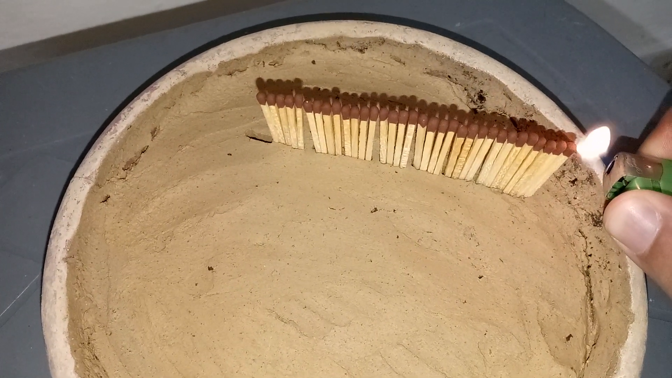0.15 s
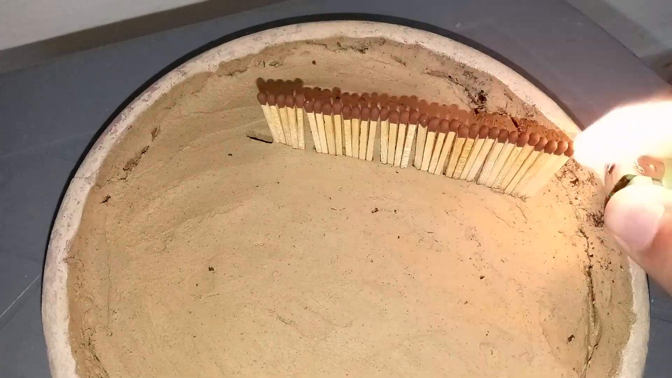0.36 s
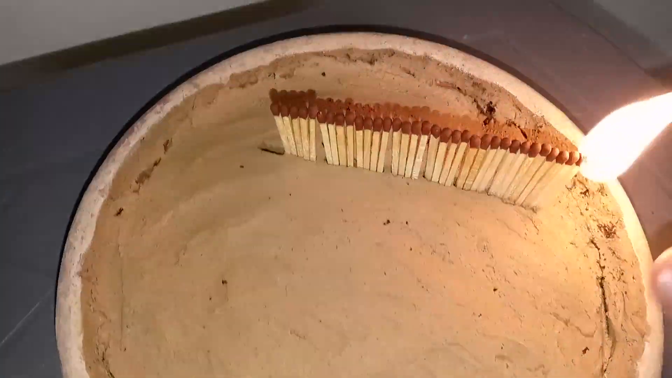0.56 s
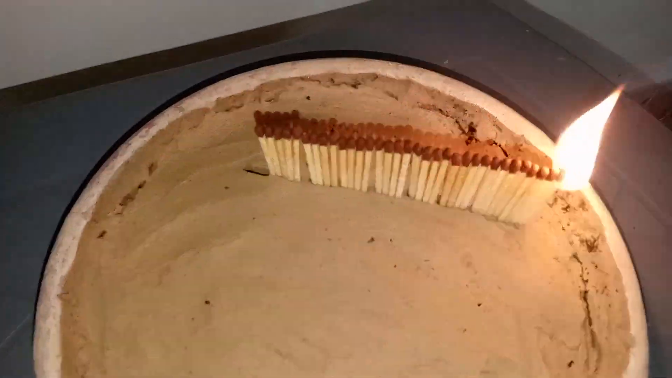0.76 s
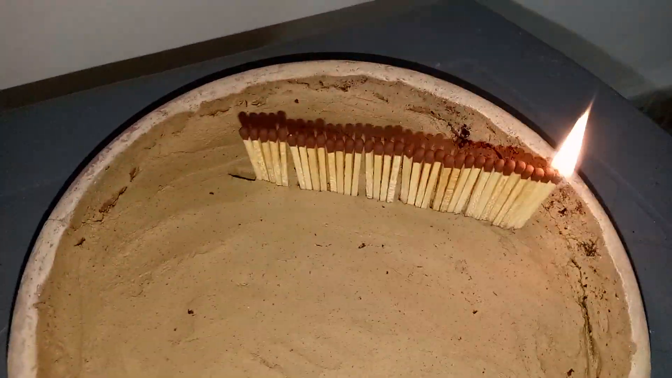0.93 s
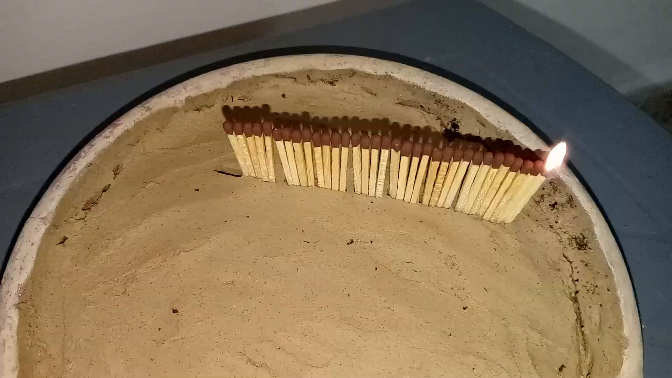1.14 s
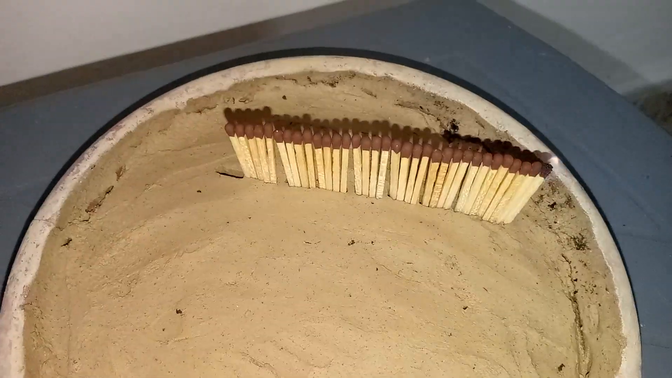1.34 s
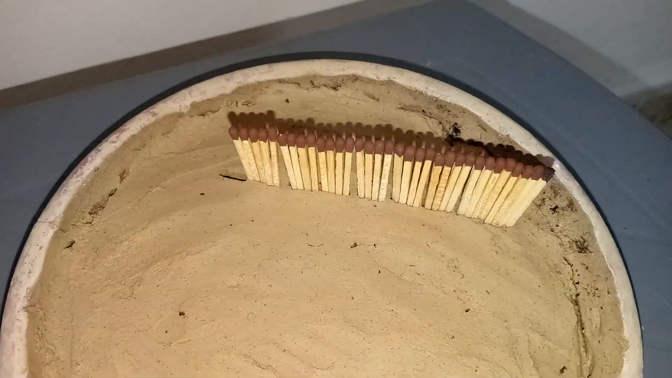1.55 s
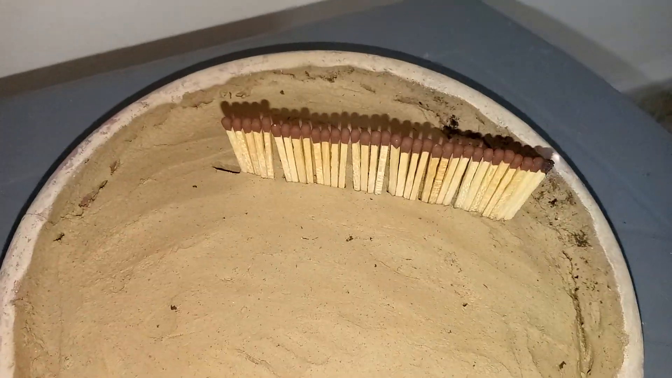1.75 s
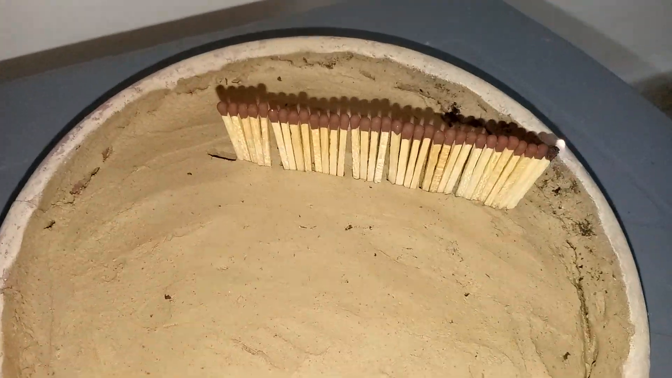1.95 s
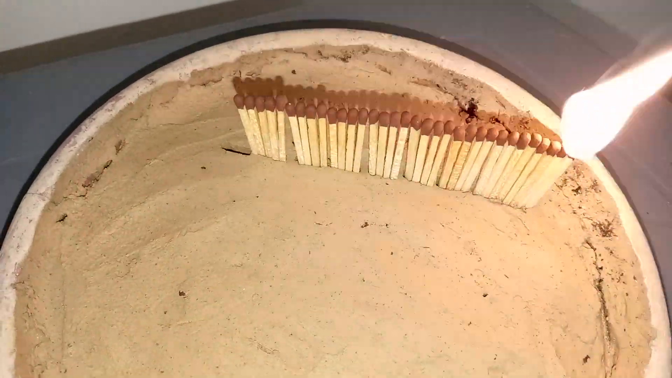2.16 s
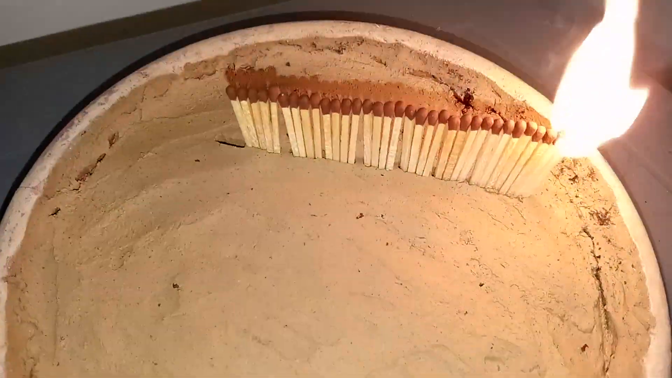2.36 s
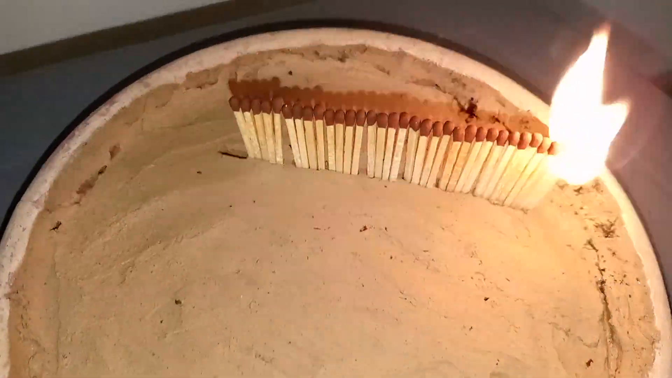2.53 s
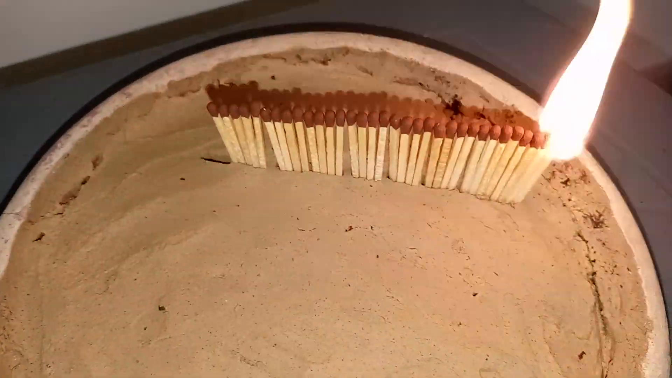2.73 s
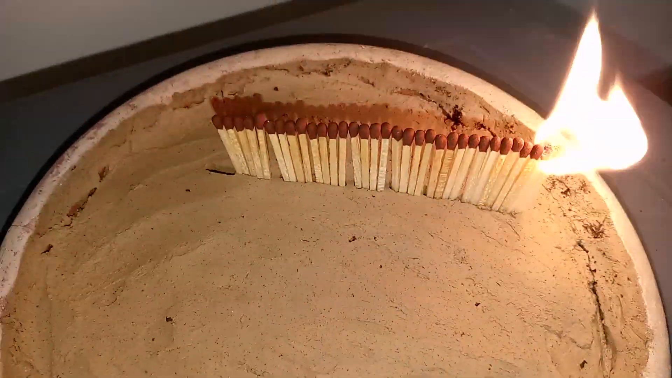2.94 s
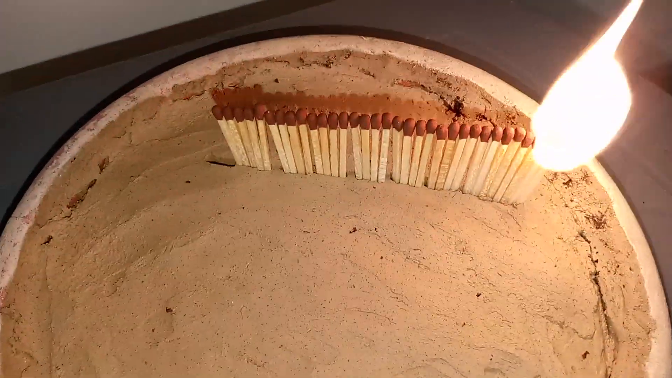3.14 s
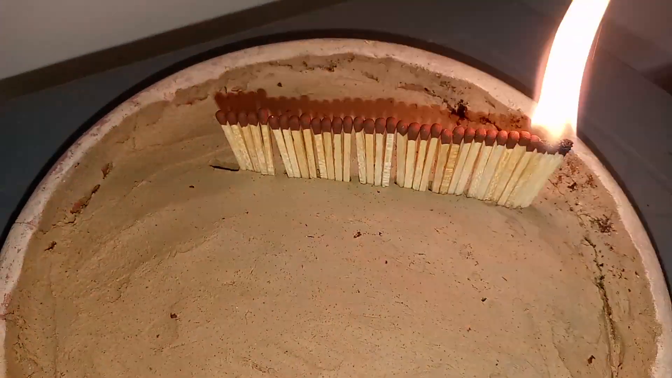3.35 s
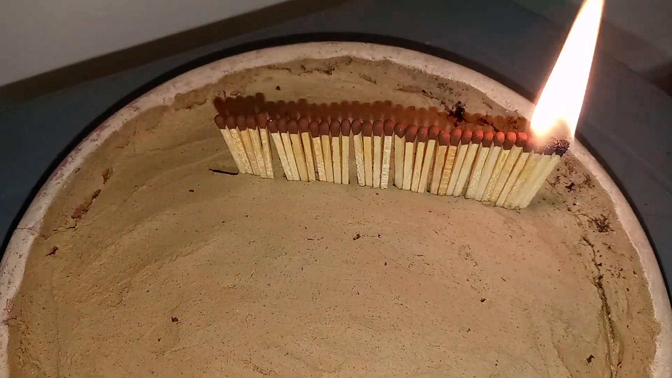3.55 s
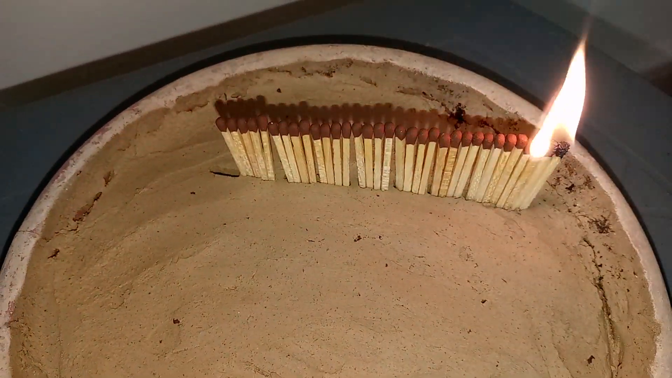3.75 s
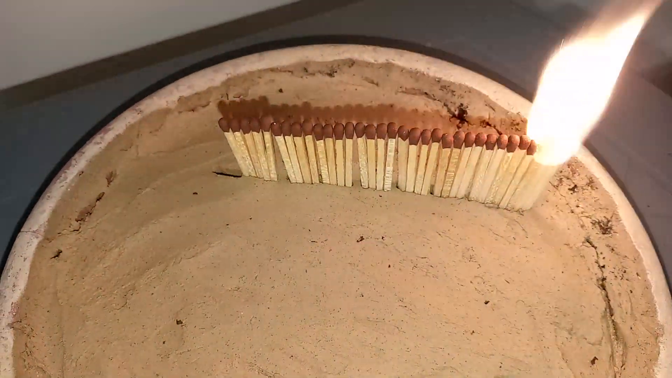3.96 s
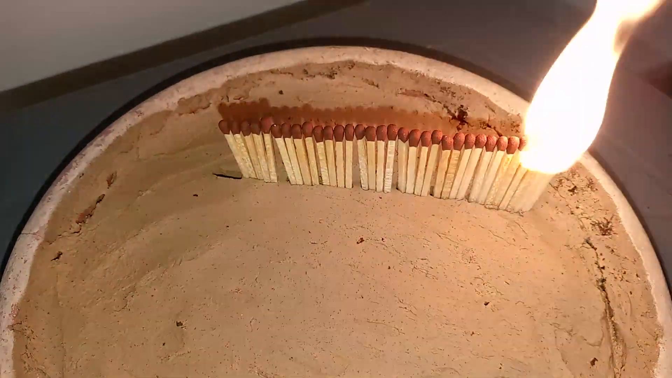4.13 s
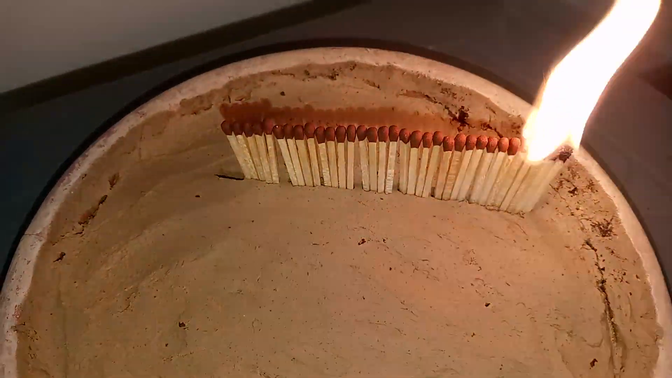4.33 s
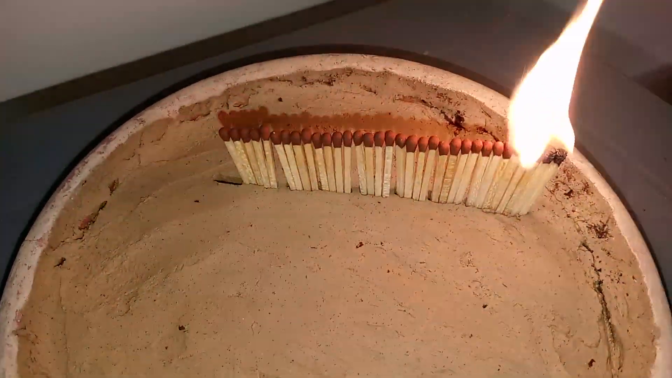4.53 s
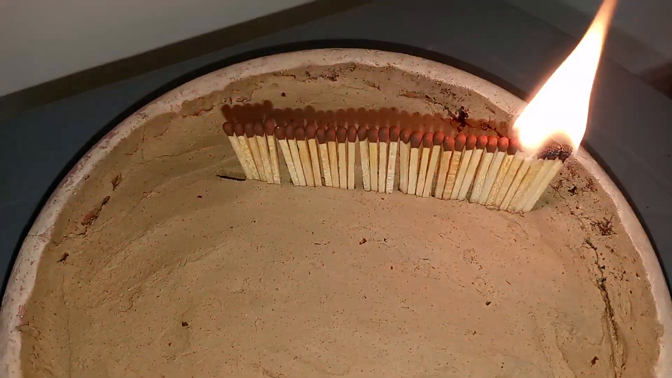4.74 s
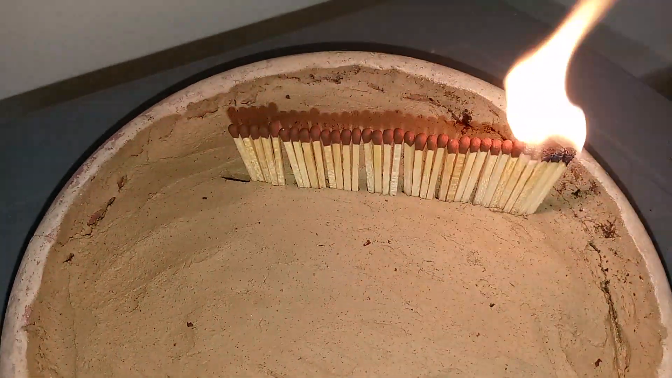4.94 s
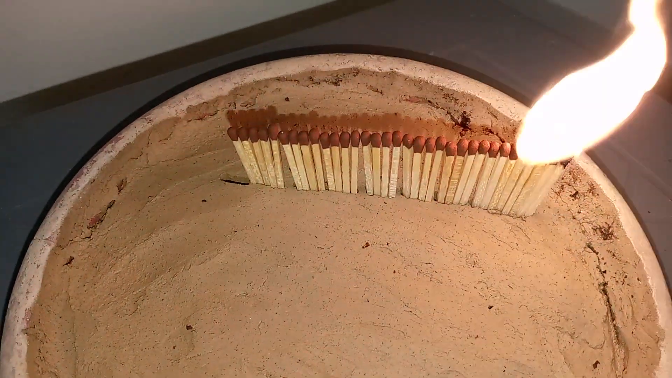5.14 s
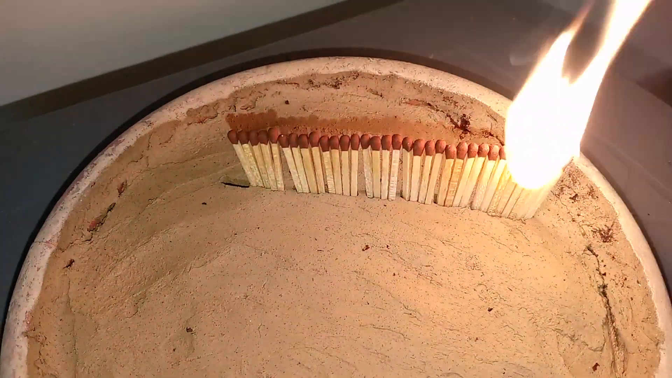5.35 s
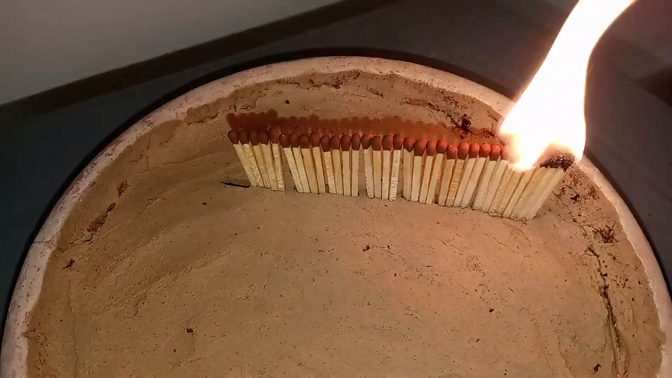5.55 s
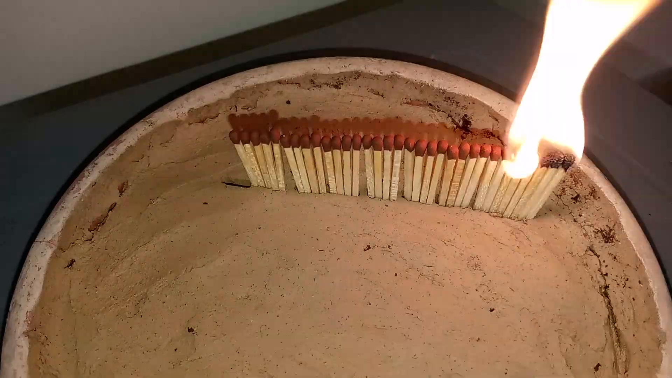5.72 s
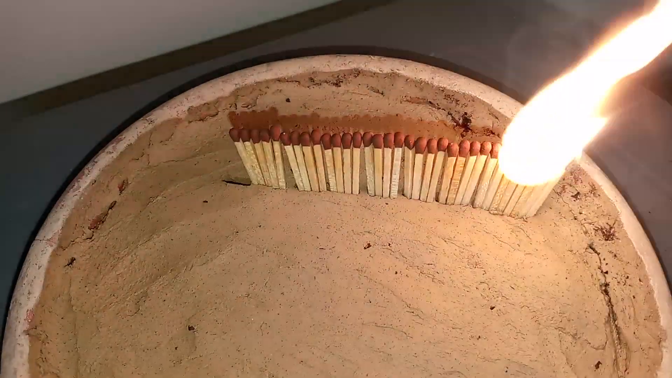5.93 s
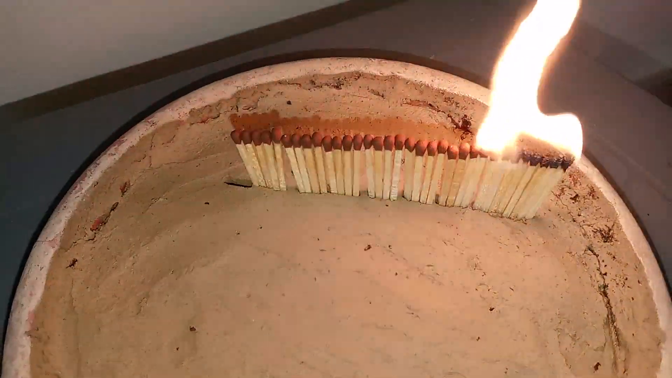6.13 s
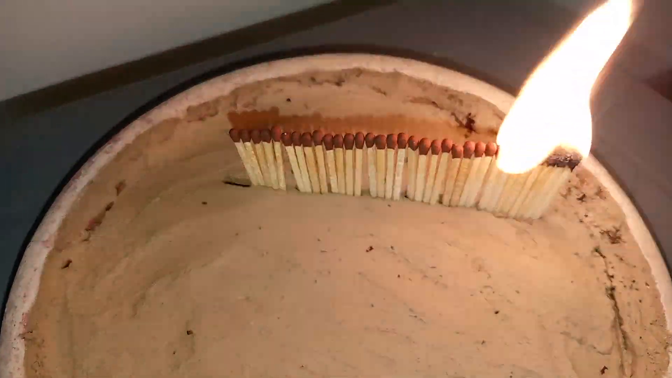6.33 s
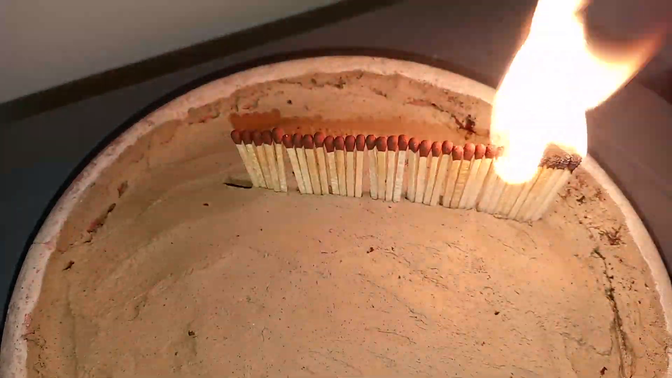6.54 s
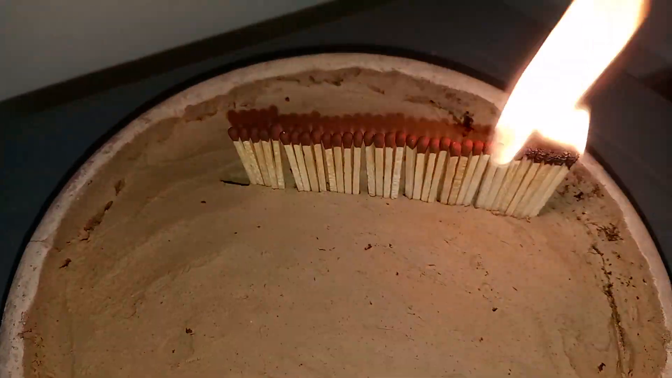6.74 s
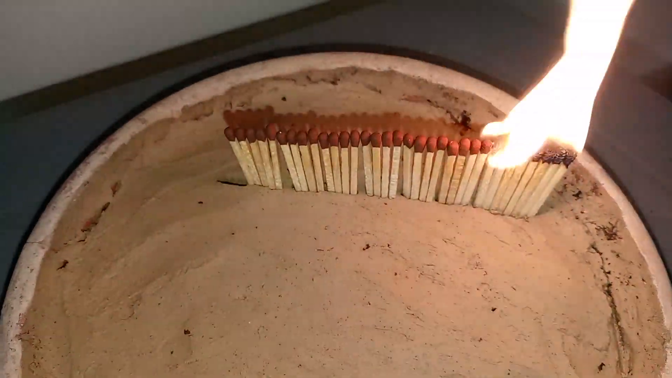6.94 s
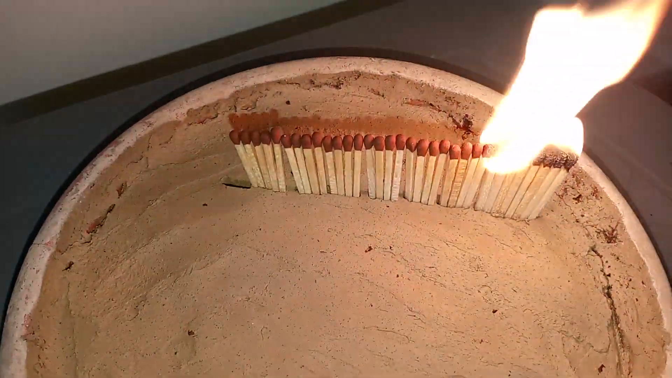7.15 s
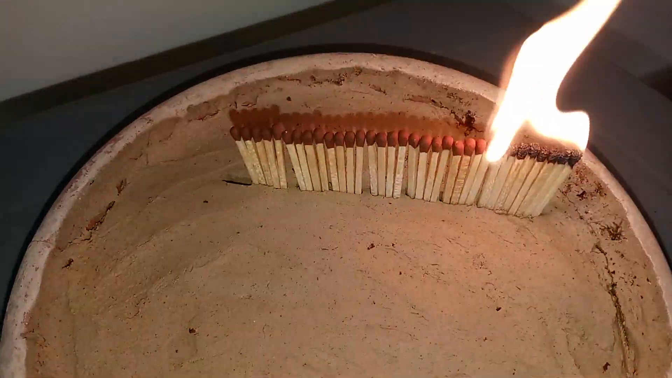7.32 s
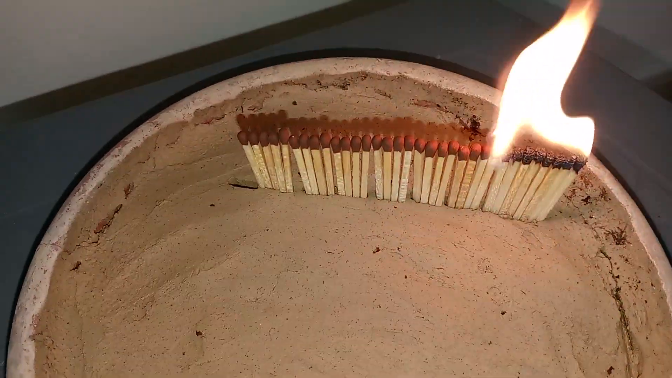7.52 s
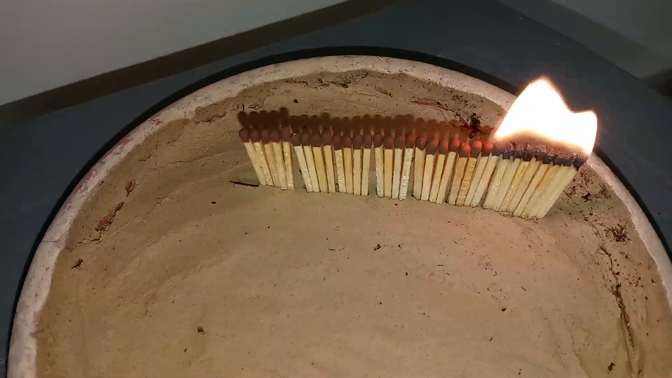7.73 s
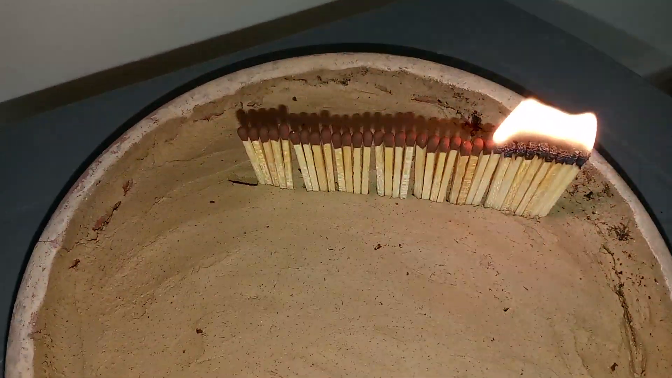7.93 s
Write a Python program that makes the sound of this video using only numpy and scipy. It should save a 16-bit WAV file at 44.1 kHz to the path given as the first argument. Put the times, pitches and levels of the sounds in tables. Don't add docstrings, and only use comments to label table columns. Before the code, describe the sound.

A close microphone hears match heads igniting in turn. A brief hiss leads to one loud, dry, bright crack, a short fading flare and cooling ticks. A quiet gap follows, then a chain of fluttering whooshes, hissing and roaring for around half a second to a second, spitting crumbs. The last is weaker and stutters out in crackles. The small room adds little echo over a very faint floor noise.

```python
import sys
import numpy as np
from scipy import signal
from scipy.fft import rfft, irfft
from scipy.io import wavfile
from scipy.ndimage import uniform_filter1d

SR = 44100
rng = np.random.default_rng(int(sys.argv[2]) if len(sys.argv) > 2 else 0)


def wrap_up_sound(samples):
    columns = np.atleast_2d(samples).T
    tamed = np.clip(columns, -1, 1)
    steps = np.round(tamed * 32767).astype(np.int16)
    wavfile.write(sys.argv[1], SR, steps)


def invert_db(level):
    return 10 ** (np.asarray(level, dtype=float) / 20)


N = 351918
TIME = np.arange(N) / SR
SIZE = 8192
HZ = np.maximum(np.arange(SIZE // 2 + 1), .5) * SR / SIZE


def rms_one(x):
    return x / np.sqrt(np.mean(x ** 2) + 1e-20)


def at_hz(points):
    hz, db = np.transpose(points)
    return np.interp(np.log(HZ), np.log(hz), db)


def causal(db):
    cepstrum = irfft(db * np.log(10) / 20, SIZE)
    cepstrum[1:SIZE // 2] *= 2
    cepstrum[SIZE // 2 + 1:] = 0
    response = irfft(np.exp(rfft(cepstrum)), SIZE)[:SIZE // 2]
    return rms_one(response) / np.sqrt(SIZE // 2)


def through(x, response):
    return signal.oaconvolve(x, response)[:N]


def lagging(x, lag_s):
    r = np.exp(-1 / (lag_s * SR))
    return signal.lfilter([1 - r], [1, -r], x)


def drift(rate, size=N):
    r = np.exp(-2 * np.pi * rate / SR)
    settle = 9000
    noise = rng.standard_normal(size + settle)
    return rms_one(signal.lfilter([1], [1, -2 * r, r * r], noise)[settle:])


def sputter(per_s, size_db, t60):
    sizes = invert_db(size_db * np.minimum(rng.exponential(1, N), 4))
    born = (rng.random(N) < per_s / SR) * sizes
    return rms_one(1 + signal.lfilter([1], [1, -invert_db(-60 / (t60 * SR))], born))


# (f/Hz, level/dB per Hz)
FLOOR_SPECTRUM = [(15, -61), (25, -35), (64, -29.5), (108, -2.5), (180, -22.5), (335, -27), (476, -14.5),
                  (754, -18.5), (1160, -20), (1260, -19), (1740, -22), (6050, -39), (16000, -46)]


def floor_noise():
    return invert_db(-70) * through(rng.standard_normal(N), causal(at_hz(FLOOR_SPECTRUM)))


# (start t/s, end t/s, f/Hz, level/dB)
WHISTLE_TONES = [(0, 0.11, 1580, -73.5), (0, .04, 1480, -80), (.08, .13, 1255, -80),
                 (2.84, 2.92, 1370, -74), (1.68, 1.81, 585, -74), (1.84, 1.89, 620, -74),
                 (1.847, 1.883, 255, -68), (1.941, 1.99, 635, -72), (1.967, 2.03, 262, -70),
                 (3.4, 3.44, 400, -71), (3.56, 3.6, 670, -76), (3.63, 3.673, 390, -72),
                 (3.716, 3.85, 620, -75), (7.42, 7.44, 350, -68), (7.558, 7.62, 640, -78),
                 (7.7, 7.98, 50, -70)]


def whistles():
    out = np.zeros(N)
    for start, end, hz, db in WHISTLE_TONES:
        at = round(start * SR)
        size = min(SR // 3, N - at)
        age = np.arange(size) / SR
        fade_db = 170 * np.maximum(age - (end - start), 0)
        swell = invert_db(db + 3.0 * drift(25, size) - fade_db)
        wavering_hz = hz * (1 + 0.015 * drift(60, size))
        out[at:at + size] += swell * np.sin(2 * np.pi * np.cumsum(wavering_hz) / SR)
    return out


def flame_rumble(roar):
    flame = invert_db(-68) + invert_db(-15.5) * lagging(roar, lag_s=0.045)
    soft = causal(-10 * np.log10(1 + (HZ / 250) ** 4) - 10 * np.log10(1 + (60 / HZ) ** 8))
    rumble = flame * invert_db(-3.0 + 2.0 * drift(12)) * rng.standard_normal(N)
    return through(rumble, soft)


# (f/Hz, level/dB per Hz)
JET_SPECTRUM = [(40, -30), (100, -9), (300, -5.5), (800, -2), (2000, -7), (5000, -5), (10000, -4.5),
                (12000, -11), (14000, -22), (16000, -22.5), (17500, -32)]


def peaks_db(path):
    return at_hz(JET_SPECTRUM) + sum(db / (1 + (2 * (HZ - hz) / width) ** 2) for hz, width, db in path)


# (t/s, level/dB)
SIZZLE = [(0, -80), (.31, -77), (.9, -57), (1.13, -57), (1.27, -61), (1.38, -72.5), (1.5, -75), (1.65, -67),
          (2.1, -70.5), (2.8, -66), (3.5, -69.5), (4.8, -66.5), (5.0, -68), (5.802, -66.5), (6.85, -68),
          (7.6, -68.5), (7.98, -73)]
# (f/Hz, width f/Hz, level/dB)
FIRST_CHAR_PATH = [(546, 63, 3), (3200, 2100, 9), (4570, 600, -10), (6100, 1100, 9.5), (8400, 940, -6),
                   (9900, 5100, 8.5), (13400, 850, -8), (14800, 1100, 9)]
# (f/Hz, width f/Hz, level/dB)
CHARRED_ROW_PATH = [(634, 120, 8), (1630, 270, 4), (3500, 800, 3.5), (4800, 530, -16), (6030, 790, 5.5),
                    (8150, 900, -10), (10100, 2300, 9.5), (13300, 720, -5), (15100, 1100, 8)]


def ember_sizzle():
    s, db = np.transpose(SIZZLE)
    level = invert_db(np.interp(TIME, s, db) - 3.0 + 1.3 * drift(24))
    sizzle = level * rng.standard_normal(N) * sputter(60, 0.99, 0.01)
    row_chars = TIME >= 2.3
    first = through(sizzle * ~row_chars, causal(peaks_db(FIRST_CHAR_PATH)))
    return first + through(sizzle * row_chars, causal(peaks_db(CHARRED_ROW_PATH)))


# (t/s, level/dB)
FIRST_HEAD_FLOW = [
    [(.272, -54.5), (.295, -51), (.36, -48), (.46, -48), (.485, -49.5)],
    [(.505, -47), (.56, -46.5), (.67, -49), (.76, -56), (.82, -50), (.85, -62), (.92, -69), (1.0, -74)],
]
# (t/s, level/dB)
ROW_HEAD_FLOW = [
    [(2.112, -48.5), (2.19, -50.5), (2.3, -48), (2.4, -47), (2.52, -46.5), (2.63, -49), (2.675, -52),
     (2.695, -70), (2.75, -69.5)],
    [(2.94, -59), (2.99, -47.5), (3.1, -49), (3.16, -45), (3.2, -49), (3.27, -47), (3.34, -61.5),
     (3.4, -68.5), (3.44, -92)],
    [(3.922, -51), (3.94, -47), (4.05, -46.5), (4.14, -48.5), (4.235, -46.5), (4.32, -45), (4.36, -51.5),
     (4.63, -48.5), (4.67, -68)],
    [(5.112, -62), (5.13, -47.5), (5.2, -51), (5.32, -48.5), (5.46, -47.5), (5.54, -51.5), (5.6, -54.5),
     (5.65, -60), (5.68, -76)],
    [(5.833, -55), (5.89, -50), (5.99, -46), (6.14, -50), (6.2, -51), (6.27, -50.5), (6.4, -44.5),
     (6.74, -51.5), (6.79, -76)],
    [(7.004, -55.5), (7.08, -52.5), (7.15, -52.5), (7.22, -49.5), (7.29, -52), (7.32, -65), (7.345, -61)],
]
# (roar level/dB, fizz level/dB, roar drift level/dB per s, mid-flare level/dB)
FLARE_CHARACTER = [
    (-1.5, -2, -10, 2),
    (-4.5, -1.5, -23, 8.5),
    (3, 0, -11.5, -1.4),
    (1.5, 0, 11, -2),
    (0.5, 1, -1.5, -0.5),
    (1.5, 0, -9.5, 3),
    (1.5, -0.5, -4.5, 2),
    (-1.5, 1.5, -9, 4),
]
# (t/s, depth level/dB, length t/s)
JET_CHOKES = [(2.127, 4.5, 0.05), (2.326, 0, .015), (2.442, 5, 0.014), (0.845, 18, 0.0095),
              (2.955, 3, 0.0072), (2.973, 11, 0.0068), (3.046, 9, 0.01), (3.331, -11.5, 0.016),
              (4.577, 4, .01), (4.593, 3, .009), (4.607, 11, 0.0093), (2.173, 6, .004), (2.19, -9, .004),
              (2.199, -7, 0.0056), (2.206, -15, 0.0036), (2.216, -4, .004), (3.35, 12, 0.0087),
              (5.117, 12, .004), (7.007, 11, 0.0055), (7.021, 9, .007), (7.082, 10, .006), (6.755, 9, .004),
              (6.743, 6, .004), (4.166, 6, 0.015), (4.6, 4, 0.0081), (7.068, 13, 0.0086), (7.108, 4, .01),
              (7.122, 0, 0.009), (7.258, 12, 0.0077), (4.415, 6, 0.013), (4.484, 11, 0.02),
              (4.555, 9, 0.025), (4.258, 36, 0.012), (4.287, 10, 0.026), (4.382, 12, 0.0078),
              (4.452, 6, 0.016), (4.52, 26, 0.022), (5.146, 50, 0.018), (5.618, 7, 0.011),
              (6.253, 6.5, 0.029), (6.708, 19, 0.028), (7.033, 10, 0.01), (7.063, 13, 0.0091)]
FULL_FLOW_DB, ROAR_LAG_S = -49, 0.0059
FIZZ_SLOPE, FIZZ_YIELDS = 1.26, 0.16
CHOKE_ROAR_SHARE = 0.51
GULPS_PER_S, GULP_DB, GULP_PER_DB = 53, 2, 0.5


def flare_levels():
    out = np.zeros((3, N))
    choke_db = sum(depth * np.exp(-(2 * (TIME - s) / length) ** 2) for s, depth, length in JET_CHOKES)
    gulps = np.clip(1.73 * drift(GULPS_PER_S) - .6, 0, 2)
    flows = FIRST_HEAD_FLOW + ROW_HEAD_FLOW
    for rows, (roar_db, fizz_db, drift_db, full_db) in zip(flows, FLARE_CHARACTER):
        s, db = np.transpose(rows)
        flow_db = np.interp(TIME, s, db) - FULL_FLOW_DB
        arch_db = full_db * np.sin(np.pi * np.clip((TIME - s[0]) / (s[-1] - s[0]), 0, 1))
        loss_db = choke_db + gulps * (GULP_DB + GULP_PER_DB * np.clip(-flow_db, 0, 10))
        lit = (TIME >= s[0]) * invert_db(FULL_FLOW_DB - 290 * np.clip(TIME - s[-1], 0, .2))
        roar_db = flow_db + roar_db + arch_db + drift_db * np.clip(TIME - s[0], 0, 1)
        out[0] += lagging(lit * invert_db(roar_db - CHOKE_ROAR_SHARE * loss_db), ROAR_LAG_S)
        out[1] += lit * invert_db(flow_db - loss_db)
        out[2] += lit * invert_db(FIZZ_SLOPE * (flow_db - loss_db) + fizz_db - FIZZ_YIELDS * arch_db)
    return out


def gas_jets(gas, levels):
    shared = drift(14)
    pockets = sputter(per_s=170, size_db=6.0, t60=0.0034) * invert_db(1.2 * drift(240))
    flutter = [invert_db(0.12 * shared + 0.79 * drift(38)) * pockets ** 0.5,
               invert_db(0.96 * shared + 0.8 * drift(35)) * pockets ** 0.41,
               invert_db(1.2 * shared + 1.2 * drift(75)) * pockets ** 0.42]
    return invert_db(-0.7) * swaying(gas * levels * [rms_one(f) for f in flutter])


def swaying(jets):
    late = TIME - 0.0005 * invert_db(3 * drift(5.1))
    return jets + invert_db(-9) * np.array([np.interp(late, TIME, jet) for jet in jets])


def ticks(hiss):
    per_s, over_hiss_db = 47, 13.5
    sizes = invert_db(over_hiss_db + 1.54 * np.minimum(rng.exponential(1, N), 3)) * rng.choice([-1, 1], N)
    struck = rng.random(N) < per_s / SR
    return struck * sizes * np.minimum(hiss, lagging(hiss, 0.028)) * invert_db([[-6], [0], [1.5]])


def spits(rows, gas, edge, crack_db):
    out, age = np.zeros((3, N)), np.arange(1000) / SR
    for s, peak_db, roar_db, fizz_db, length in rows:
        at = round(s * SR)
        puff = np.exp(-(age / max(length, .0005)) ** edge * 2.0) * gas[at:at + len(age)]
        puff[0] += invert_db(crack_db)
        voices_db = np.array([[roar_db], [0], [fizz_db]])
        out[:, at:at + len(age)] += invert_db(peak_db - 12 + voices_db) * puff
    return out


def crumbs(rows):
    return [(s, db - 1, -4.5 - bright_db, 0.5 + bright_db, length) for s, db, bright_db, length in rows]


# (t/s, peak level/dB, brightness level/dB, length
# t/s)
FIRST_CRUMBS = [(0.2932, -37, -17, 0.0016), (0.8362, -35, 2, 0.0027), (0.8521, -32, 2, 0.0017),
                (0.8661, -33, -2, 0.0017), (0.8705, -40, -4, 0.0013), (0.9433, -31.5, -2, 0.0023),
                (0.9531, -39, -7.5, 0.0023), (0.9869, -45, -6, 0.0011), (1.0102, -43, -8, 0.0023),
                (1.2033, -40.5, -5, 0.0046), (1.2673, -45, 2, 0.0048), (1.2707, -45, 1, 0.0017),
                (1.2748, -44, 1, 0.003), (1.3759, -58, -7, 0.0025), (1.5351, -45.5, 1, 0.0019),
                (1.5373, -50, -5, 0.0035), (1.577, -47, 1, 0.0019), (1.6475, -59, -3, 0.0023),
                (0.823, -34, -1, 0.0018),
    (.8853, -37, -7, .002),
    (0.902, -41, -6, .002),
    (1.075, -43.5, -11, .003),
    (1.178, -51, -10, 0.0018),
    (1.7294, -49, -6, .003),
]
# (t/s, peak level/dB, brightness level/dB, length t/s)
CATCHING_CRUMBS = [(2.1168, -42, -5, 0.0035), (2.1598, -38, 3, 0.0011), (2.1631, -37, 0, 0.0037),
                   (2.1733, -33, 14, 0.002), (2.2204, -28, 6, 0.0015), (2.2634, -34, 9, 0.0016),
                   (2.5172, -36, 0, 0.0014), (2.5551, -31.5, 7.5, 0.0041), (2.6802, -39, 10, 0.002),
                   (2.7037, -31, -3, 0.0015), (2.8434, -36.5, -2, 0.0024), (2.9413, -30.5, -3.5, 0.0068),
                   (2.9583, -36, -4, 0.0038), (2.9758, -21.5, -2, 0.0008), (2.9939, -28, -3, 0.0019),
                   (3.3605, -47, -8, 0.003), (3.3815, -41, -14, 0.0023), (3.3864, -48, 10, 0.0018),
                   (3.3954, -43, -8, 0.0018), (3.5361, -55, 4, 0.0018), (3.5413, -35, 4.5, 0.0021),
                   (3.6513, -55, -5, 0.0013), (3.6844, -39, -2.5, 0.0029)]
# (t/s, peak level/dB, brightness level/dB, length t/s)
THIRD_FLARE_CRUMBS = [(3.7272, -54, 5, 0.0013), (3.7365, -52, -4, 0.0027), (3.8526, -36, -1.5, 0.0028),
                      (3.8657, -30.5, -2.5, 0.0014), (3.9001, -43.5, -12, 0.0024), (3.9049, -44, 3, 0.0023),
                      (3.9139, -39, -5, 0.0016), (3.9188, -37, 1, 0.0014), (3.9484, -35, 9, 0.0011),
                      (4.1816, -34, -6, 0.0023), (4.3451, -39, -11, 0.0011), (4.4327, -29, -9.5, 0.0022),
                      (4.5072, -28, -2, 0.0013), (4.5128, -26.5, 2.5, 0.0016), (4.5382, -32, 1, 0.0013),
                      (4.5664, -31, -5, 0.0035), (4.5869, -29, 2, 0.0018), (4.6027, -30, -3, 0.0012),
                      (4.6559, -35, -1, 0.0021), (4.6772, -40, 3, 0.0034), (4.6964, -36, -1, 0.0012),
                      (4.7155, -45, 1, 0.0034), (4.7217, -29, -2.5, 0.0023), (4.8124, -35, 1, 0.0015),
                      (4.8159, -34, 2, 0.0022), (4.8749, -41, 0.5, 0.0025)]
# (t/s, peak level/dB, brightness level/dB, length t/s)
FOURTH_FLARE_CRUMBS = [(5.0564, -36, -4, 0.0034), (5.0747, -34, -4, 0.0019), (5.1025, -42, -13.5, 0.0026),
                       (5.1118, -39, -4, 0.0016), (5.118, -38, -11, 0.0013), (5.1314, -40, -4, 0.0026),
                       (5.1356, -31, -5, 0.0027), (5.14, -30, 2, 0.0017), (5.1601, -34, -6, 0.0017),
                       (5.203, -32, -2, 0.0029), (5.24, -35, -5, 0.0034), (5.2557, -42, -4, 0.0013),
                       (5.2785, -37, 7, 0.0013), (5.3334, -27, -8, 0.0025), (5.552, -33, -2, 0.0023),
                       (5.6084, -34, 0, 0.0015), (5.6412, -35.5, 3, 0.0038), (5.644, -42, -3, 0.0041),
                       (5.6615, -37, 0, 0.0011), (5.7165, -31.5, 1, 0.0016), (5.7232, -42.5, -12, 0.0056),
                       (5.8101, -36.5, -7, 0.0029), (5.8336, -31, -2, 0.0019), (5.8495, -35, 9, 0.0016),
                       (5.8854, -28.5, -7, 0.0024)]
# (t/s, peak level/dB, brightness level/dB, length t/s)
LAST_CRUMBS = [(6.172, -27.5, 8.5, 0.0012), (6.203, -26, 0, 0.0028), (6.692, -30, 2, 0.002),
               (6.7527, -36, 2, 0.0015), (6.758, -36, 0, 0.0027), (6.7696, -52, 1, 0.0014),
               (6.821, -40, -2, 0.002), (7.0017, -41, 0, 0.0072), (7.0063, -37, -7, 0.0015),
               (7.0148, -39, -9, 0.0012), (7.029, -36, -6, 0.0019), (7.0637, -34, -2, 0.0013),
               (7.0684, -42, -5, 0.002), (7.076, -30, 1, 0.0027), (7.083, -35, -1, 0.0013),
               (7.0973, -29, -4, 0.0026), (7.135, -33, -8, 0.0025), (7.153, -29, -9, 0.0015),
               (7.174, -37, -14, 0.0016), (7.265, -43, 3, 0.0022), (7.2794, -27.5, -4, 0.0018),
               (7.296, -32.5, 4, 0.0016), (7.3055, -35, 4, 0.0019), (7.313, -42, -1, 0.0018),
               (7.3413, -35, 2, 0.0022), (7.3554, -33.5, 0, 0.0053), (7.3766, -40, -12, 0.0043),
               (7.398, -40, 4, 0.0015), (7.409, -44, -1, 0.0021), (7.4152, -34.5, -4.5, 0.0034),
               (7.427, -34, 1, 0.0012), (7.482, -32.5, 1, 0.0017), (7.691, -45.5, 6, 0.0047),
               (7.8765, -50, -14, 0.0031), (7.9571, -52, 2, 0.0021)]


def crumb_spits(gas):
    early = FIRST_CRUMBS + CATCHING_CRUMBS
    late = THIRD_FLARE_CRUMBS + FOURTH_FLARE_CRUMBS + LAST_CRUMBS
    return spits(crumbs(early + late), gas, edge=1.06, crack_db=11)


def three_voices(path):
    def below(edge_hz):
        return -10 * np.log10(1 + (HZ / edge_hz) ** 12)

    def above(edge_hz):
        return -10 * np.log10(1 + (edge_hz / HZ) ** 12).clip(max=6)

    roar_top_hz, fizz_foot_hz = 2500, 8200
    split = below(roar_top_hz), above(roar_top_hz) + below(fizz_foot_hz), above(fizz_foot_hz)
    return [causal(peaks_db(path) + np.maximum(s, -60)) for s in split]


# (f/Hz, width f/Hz, level/dB)
FIRST_HEAD_PATH = [(288, 120, 10), (650, 390, 10.5), (1500, 1400, 11.5), (1930, 260, -9), (2540, 190, -7.5),
                   (3470, 1170, 11), (4580, 1350, -10), (6070, 180, 8.5), (6550, 310, 5), (7030, 200, 4),
                   (7990, 390, -6), (9300, 730, 7), (10400, 1100, 4), (11400, 850, 2), (13300, 970, -5),
                   (15000, 570, 3)]
# (t/s, peak level/dB, roar level/dB, fizz level/dB, length t/s)
BURST = [
    (0.4931, -11.5, -21, 6.5, 0.0013),
    (0.4946, -20, -10, 6, 0.0016),
    (0.4964, -21.5, -10.5, 6, 0.0018),
    (0.4985, -29, -10, 5, 0.002),
    (0.5077, -30, -6, -3, .0012),
]
# (f/Hz, width f/Hz, level/dB)
BURST_COLOUR = [(11300, 1500, 5), (15500, 2500, 11), (3300, 900, -4), (9500, 900, -3), (13000, 900, 4)]


def head_burst(gas):
    burst = spits(BURST, gas, edge=1.5, crack_db=9)
    voices = three_voices(FIRST_HEAD_PATH + BURST_COLOUR)
    return sum(through(b, voice) for b, voice in zip(burst, voices))


# (t/s, peak level/dB, brightness level/dB, length t/s)
GAS_PUFFS = [(.77, -36.5, -2.5, 0.024), (.788, -47, -4, 0.024), (4.2665, -40.5, 7.5, 0.026),
             (7.0414, -37.5, 7, 0.013), (7.4615, -42, 4, 0.0096), (7.506, -39, 3, 0.017),
             (6.7154, -39.5, 6.5, 0.019), (6.729, -42.5, 5, 0.021), (5.679, -44, 6, 0.017),
             (5.722, -41.5, 1, .009), (2.6, -38, -17, 0.0034), (6.746, -36, 3, 0.0042),
             (3.326, -41.5, 4, 0.016), (0.62, -40, 2, 0.005), (.9725, -39, 1.5, 0.0056)]


def gas_puffs(gas):
    return spits(crumbs(GAS_PUFFS), gas, edge=3.9, crack_db=3)


# (f/Hz, width f/Hz, level/dB)
SHARED_ROW_PATH = [(244.4, 82, 12.5), (327.4, 12, 10), (628, 525, 14.5), (1008, 93, 7), (1200, 32, -1.5),
                   (1608, 950, 17), (2344, 126, 9.5), (2455, 204, -15), (3600, 500, 7.5), (4710, 410, -4.5),
                   (5720, 240, 7.5), (6050, 96, -2.5), (6870, 320, 4.5), (7350, 220, -4.5), (8080, 370, -9),
                   (10000, 1440, 12.5), (11200, 500, 5.5), (12600, 370, -6), (13800, 700, -2),
                   (14700, 930, 5)]
# (from t/s, [(f/Hz, width f/Hz, level/dB)])
ROW_HEADS = [
    (1.45, [(2185, 420, -6.5), (5800, 590, -5), (8000, 290, 3), (11140, 400, -3), (12600, 440, -11), (14100, 1500, -2)]),
    (2.8, [(860, 73, -2.5), (2850, 180, 4), (8060, 2600, -3.5), (11300, 700, -5), (12600, 400, -4), (13800, 1200, -5)]),
    (3.5, [(3120, 130, -3), (4800, 300, -2.5), (8340, 510, -7), (11300, 430, -3), (14000, 700, -6)]),
    (4.78, [(4920, 240, -11), (11100, 500, 0), (12800, 400, -6), (14800, 1400, 6)]),
    (5.78, [(2260, 100, -4), (4800, 380, -7.5), (6500, 130, 8), (12100, 400, -2), (14700, 1200, 7)]),
    (6.9, [(1200, 140, -4), (2570, 280, -5), (4800, 400, -9), (5820, 200, -2), (12200, 400, -1), (14800, 1600, 8)]),
]


def from_dish(jets):
    starts = [0] + [round(s * SR) for s, own in ROW_HEADS] + [N]
    paths = [FIRST_HEAD_PATH] + [SHARED_ROW_PATH + own for s, own in ROW_HEADS]
    out = np.zeros(N + SIZE)
    for a, b, path in zip(starts, starts[1:], paths):
        heard = sum(signal.oaconvolve(jet[a:b], voice) for jet, voice in zip(jets, three_voices(path)))
        out[a:a + len(heard)] += heard
    lag, row = round(0.0047 * SR), starts[1]
    out[row + lag:] += invert_db(-23.5) * out[row:-lag]
    return out[:N]


def room(x):
    t60_s, level_db, wall_cut_hz = 0.13, -10.5, 5200
    age = np.arange(SR // 3) / SR
    tail = rng.standard_normal(len(age)) * invert_db(-60 * age / t60_s) * (age > .003)
    tail = lagging(tail, 1 / (2 * np.pi * wall_cut_hz))
    return through(x, invert_db(level_db) * tail / np.sqrt(np.sum(tail ** 2)))


def scene():
    levels = flare_levels()
    gas = rng.standard_normal(N)
    jets = gas_jets(gas, levels) + crumb_spits(gas) + gas_puffs(gas) + ticks(levels[1])
    fire = from_dish(jets) + head_burst(gas)
    fire = fire + flame_rumble(levels[0]) + ember_sizzle()
    mono = fire + room(fire) + whistles() + floor_noise()
    return np.array([mono, mono])


def low_pass(x):
    return signal.sosfilt(signal.butter(12, 17090, fs=SR, output="sos"), x)


def record(dry):
    cut_hz, leak_over_db, leak_db = 15800, 11.5, 0
    cut = signal.sosfilt(signal.ellip(12, .5, 70, cut_hz, fs=SR, output="sos"), dry)
    top_band = signal.ellip(8, .5, 70, [cut_hz, 17050], "band", fs=SR, output="sos")
    top = signal.sosfilt(top_band, dry)
    fast = uniform_filter1d(top ** 2, size=64)
    slow = uniform_filter1d(top ** 2, size=2000)
    leak = uniform_filter1d(1. * (fast > invert_db(leak_over_db) ** 2 * slow), size=100)
    return low_pass(cut + invert_db(leak_db) * leak * top)


dry = scene()
out = record(dry)
wrap_up_sound(out)
```